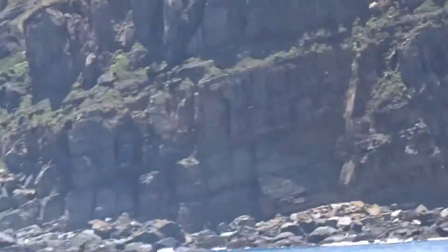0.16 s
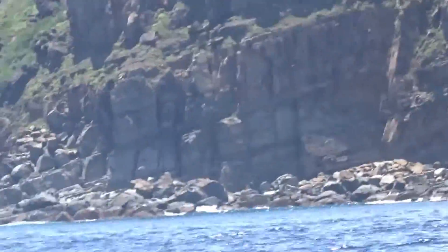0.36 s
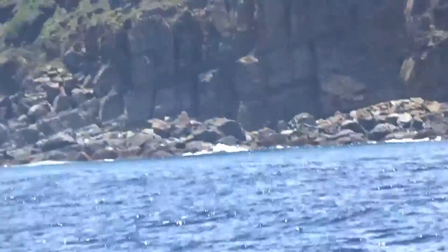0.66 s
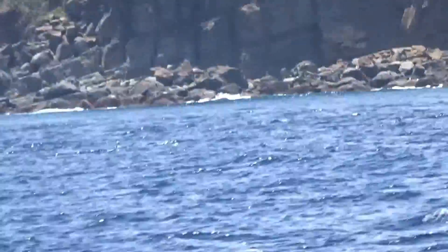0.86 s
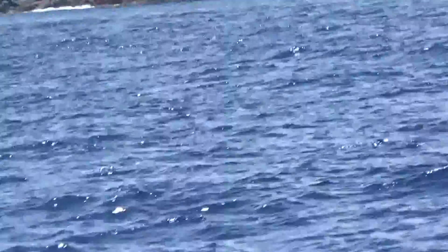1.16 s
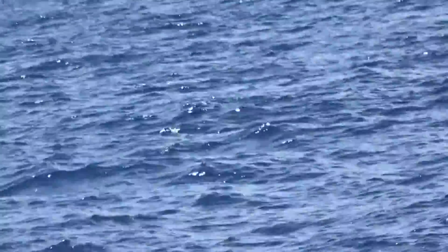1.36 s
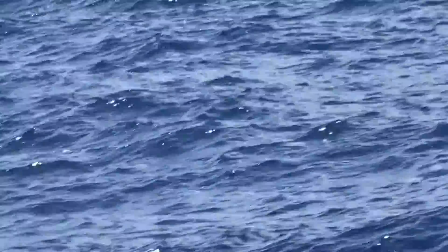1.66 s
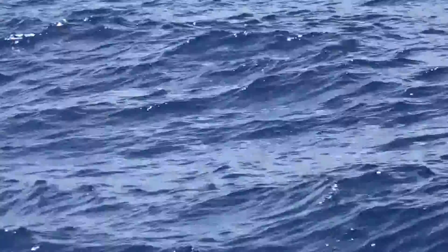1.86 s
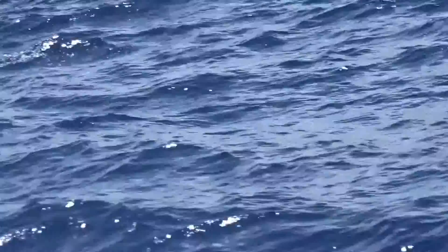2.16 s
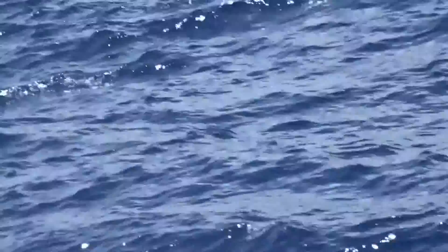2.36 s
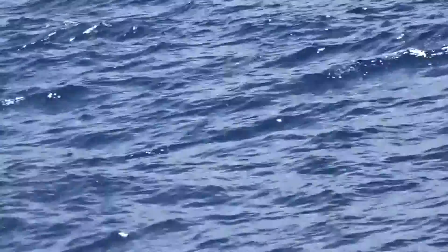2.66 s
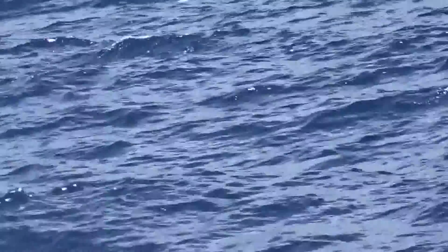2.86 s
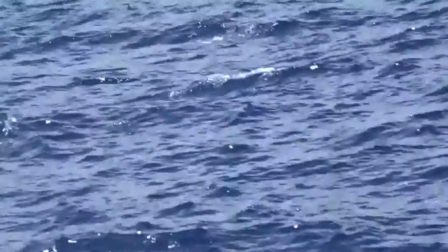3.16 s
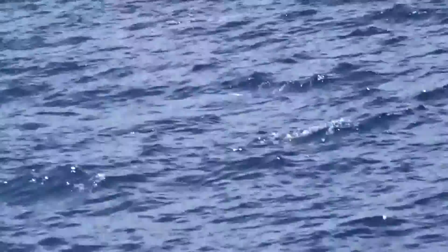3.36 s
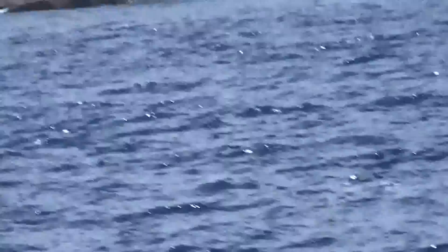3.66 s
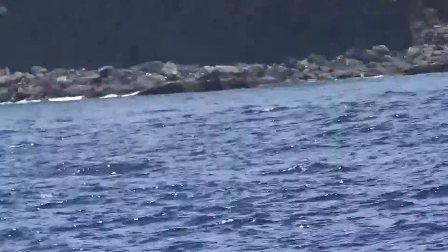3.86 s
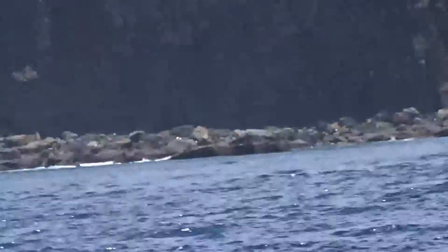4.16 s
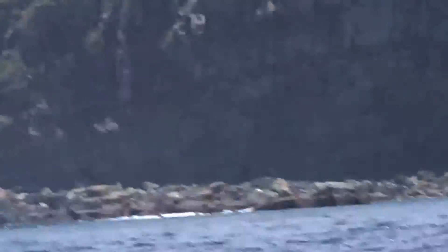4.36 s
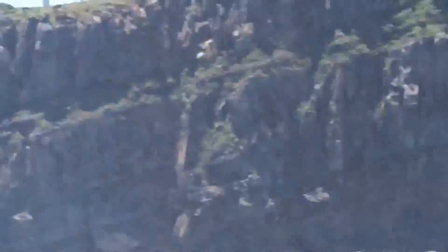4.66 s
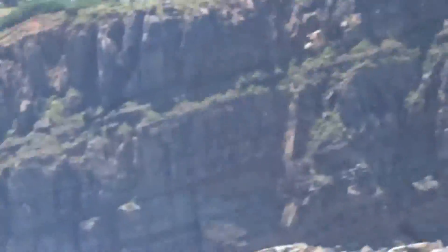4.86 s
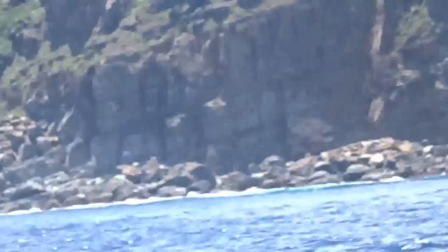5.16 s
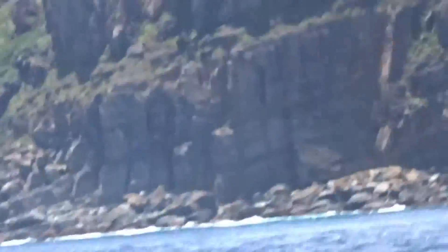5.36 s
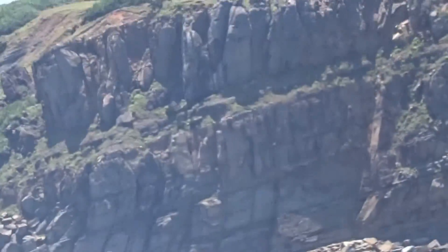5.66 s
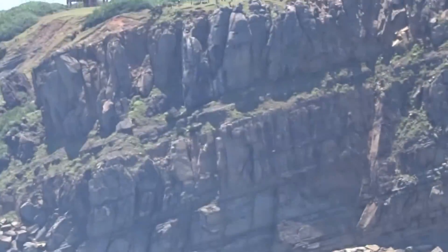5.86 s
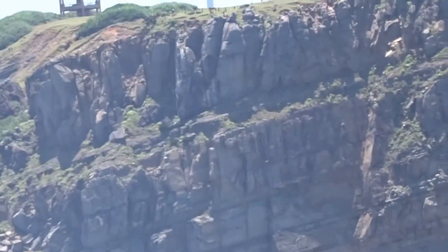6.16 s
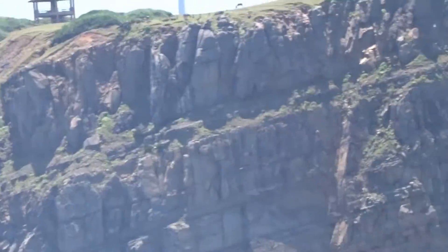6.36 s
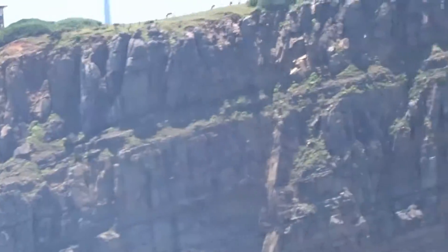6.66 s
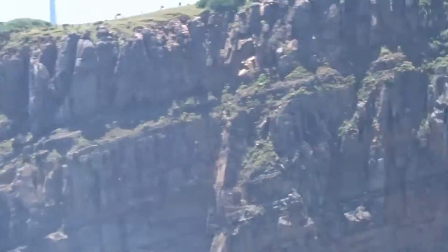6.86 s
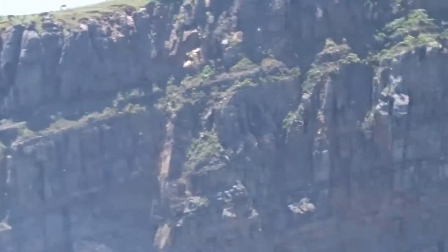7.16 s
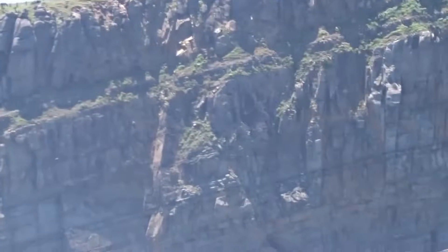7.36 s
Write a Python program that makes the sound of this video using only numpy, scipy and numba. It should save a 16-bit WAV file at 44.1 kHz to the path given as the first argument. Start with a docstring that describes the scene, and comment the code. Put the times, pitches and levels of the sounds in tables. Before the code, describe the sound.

A ship's engines hum low and steady under a broad roar, with a thin high whine and brief wind buffets on the microphone.

```python
"""Ship under way, on deck

Two main engines and a generator hum, each a set of tones locked to its crank, and beat together.
Exhaust, fans and wash roar above them as shaped noise; a turbocharger whines in lines and hiss.
Gusts buffet the microphone with bursts of low noise and single slaps, and the camera's
fast gain control pumps everything with the throb of the hum.
"""
import sys
import numpy as np
from scipy import signal
from scipy.fft import rfft, irfft, next_fast_len
from scipy.io import wavfile
from scipy.ndimage import uniform_filter1d, minimum_filter1d, map_coordinates
from numba import njit

SR = 44100
rng = np.random.default_rng(int(sys.argv[2]) if len(sys.argv) > 2 else 0)


def unload_audio(sound):
    """Save the sound as a 16-bit wav file, at the path given as the first command line argument."""
    columns = np.transpose(np.atleast_2d(sound))
    # keep every value between -1 and 1, then stretch to whole-number steps
    steps = np.round(np.clip(columns, -1, 1) * 32767)
    wavfile.write(sys.argv[1], SR, steps.astype(np.int16))


N = 331632

# Source levels are those ahead of the gain control; colours are relative.
# hum of each machine: [multiple of the cycle, rms level/dB]; starboard's level is that at mid roll
PORT_TONES = [(5, -19.5), (6, -20), (8, -36.5), (9, -40), (11, -25), (16, -34), (19, -47), (25, -45),
              (34, -44), (39, -48), (46, -51.5), (49, -50.5), (53, -50.5), (55, -50), (60, -49),
              (72, -49.5)]
STARBOARD_TONES = [(5, -36), (6, -34.5), (10, -43), (11, -32.5), (13, -38), (16, -41), (18, -46)]
GENERATOR_TONES = [(6, -44), (8, -43), (9, -39), (11, -34.5), (13, -30.5), (16, -41)]
# further port tones, shifted in phase: [multiple of the cycle, rms level/dB]
PORT_MIDDLE_TONES = [(10, -40.5), (12, -42), (13, -35), (17, -43), (20, -44.5)]
PORT_HIGH_TONES = [(21, -45), (22, -38.5), (23, -44), (27, -51), (30, -45)]
# mean cycles per second, swing with the roll in cycles per second, crank angle at the start in turns
PORT_RUN = (7.4414, .0259, .094)
STARBOARD_RUN = (7.3551, -.0276, .039)
GENERATOR_RUN = (8.2824, .006, 0)
# the ship rolls in the swell: one main engine speeds up while the other labours
ROLL_S, ROLL_PEAK_S = 4.82, 3.55  # period, moment of the deepest roll
LABOUR_DB = 3.3  # starboard is louder by this when it labours, softer when it runs free

# course of the roar: [t/s, level/dB]
ROAR_LEVEL = [(0, -26), (1, -26), (2.9, -27), (3.5, -26), (4.1, -26), (5.2, -25.5), (5.9, -26.5),
              (7.52, -25.5)]
# spectra of roar, spray and hull rumble: [f/Hz, level per Hz/dB]
ROAR_COLOUR = [(120, -1), (200, -2), (230, -0.5), (405, -0.5), (467, -2.5), (531, -2.5), (831, -4),
               (1090, -3), (1340, -5.5), (1440, -5), (3240, -11), (3930, -16.5), (4300, -19), (5590, -53),
               (9460, -120)]
SPRAY_COLOUR = [(3000, -49), (4300, 2), (5400, 2), (6200, -2), (8000, -4), (11200, -3.5), (12500, -13),
                (13800, -22), (14300, -32), (15000, -50)]
RUMBLE_COLOUR = [(15, 12), (28, 7), (45, 6.5), (62, -3), (92, 6), (150, 1), (220, -7), (400, -42)]
# duct resonances in the roar: [f/Hz, width/Hz, boost/dB]
DUCT_RESONANCES = [(540, 41, 2.5), (1070, 160, 4), (2420, 270, 2), (256, 15, 1.5), (1443, 17, 5.5),
                   (1510, 57, 2.5), (3380, 320, 2.3)]
# the roar swells once a port engine cycle and rattles
CHUG_DB, CLATTER_DB = .4, .55
CHUG_UNEVEN = .3  # share by which the swells differ
CHUG_ROLL = .5  # share of the chug lost in the deep roll and gained in the opposite one
CHUG_TURN = .53  # crank angle of the swell, in turns
# now and then one swell stands out: [t/s, extra level/dB]
SURGES = [(.345, 1), (.47, 1.5), (.605, 3), (.875, 1), (3.43, 2), (4.78, 2), (5.31, 0.5), (5.97, 4),
          (7.2, 2.5), (7.33, 2)]
SURGE_S = 0.019  # from the top of a surge to 1/e of its dB
# a band of the roar comes and goes
UPPER_BAND_HZ, UPPER_BAND_WIDTH_HZ, UPPER_BAND_DB = 1220, 120, 4.2
# how much of that band is heard: [t/s, share 0-1]
UPPER_BAND_SHARE = [(0, 0.4), (2, .2), (4.5, 0), (5.8, .4), (6.8, 0.6), (7.52, 1)]
SPRAY_DB = -14  # mean level relative to the roar
SPRAY_EXTRA_SWING = .38  # the spray follows the roar's course wider by this share
SPRAY_CHUG = 1.13  # the treble takes the chug more strongly

# turbocharger blade tone, about which the pitch wavers: [t/s, f/Hz]
BLADE_TONE = [(0, 4565), (3.1, 4564), (4.4, 4535), (6, 4513), (7.52, 4510)]
# whine at rest: [line counted from the blade tone, rms level/dB]
LINES_AT_REST = [(-2, -57), (-1, -54), (0, -58), (1, -60), (2, -58)]
# lines that sing out by turns: [start t/s, end t/s, line, rms level/dB]
SINGING_LINES = [(-.1, .55, -1, -46), (.9, 2.98, -1, -44), (2.7, 3.87, 0, -45.5), (3.5, 3.99, -1, -43.5),
                 (4.07, 4.36, 0, -41), (4.36, 5.75, 0, -48), (4.75, 5.6, 1, -49), (-.1, 3.0, -2, -52),
                 (1.4, 2.3, 0, -51), (-.1, 2.4, 1, -53), (4.45, 5.8, -1, -45), (5.87, 6.38, -1, -43),
                 (6.55, 6.8, -1, -49), (6.85, 6.98, 0, -42), (7.15, 7.4, 0, -44)]
LINE_SPACING_HZ, LINE_DRIFT_HZ, SING_FADE_S = 40, 1.4, .08
# bands of hiss: [multiple of the blade tone, width/Hz, rms level/dB]
BLADE_HISS = [(1, 130, -44.5), (1.5, 110, -55.5), (2.0, 210, -51)]

# puffs of wind on the microphone: [peak t/s, peak level/dB, length/s between points 11 dB down]
PUFFS = [(2.197, -18, 0.07), (2.267, -23.5, 0.12), (2.304, -19, .09), (2.34, -16, 0.03),
         (2.405, -24, 0.099), (2.492, -24, 0.22), (2.692, -26.5, 0.19), (3.42, -29, 0.16),
         (3.978, -23, 0.09), (4.007, -13, 0.04), (4.05, -12, 0.039), (4.098, -17, 0.055),
         (4.176, -20, 0.21)]
PUFF_RISE = 0.54  # share of the length before the peak
# single slaps of air, most of them inside the gusts: [t/s, level/dB, f/Hz, push +1 or pull -1]
SLAPS = [(2.187, -15, 250, 1), (2.281, -12, 400, -1), (2.305, -12, 250, -1), (2.332, -5, 450, -1),
         (2.345, -6, 330, 1), (2.49, -21, 300, 1), (3.989, -10, 258.6, -1), (4.0, -2, 300, 1),
         (4.014, -7, 200, 1), (4.032, -14, 300, 1), (4.049, -6, 400, 1), (4.055, -8, 350, -1),
         (4.098, -2, 453, 1), (4.172, -10, 300, -1), (4.191, -10, 280, 1), (4.776, -17, 250, 1),
         (5.828, -11, 300, 1)]
SLAP_CYCLES = 0.42  # from the middle of a slap to 1/e
# spectra of the buffeting and its rasp: [f/Hz, level per Hz/dB]
BUFFET_COLOUR = [(30, -3), (70, -4), (140, 2.5), (220, -.5), (400, -9.5), (800, -21), (1500, -47),
                 (3000, -70)]
RASP_COLOUR = [(150, -40), (300, -4), (500, 8.5), (750, 9), (1000, -35), (2000, -70)]
RASP_DB, RASP_GROWS = -22, 2.7  # level at a puff of -13 dB, power of growth: only strong puffs rasp

# faint noise, independent on the two sides: [f/Hz, level per Hz/dB]
SIDE_NOISE_COLOUR = [(20, 20), (45, 2), (80, 23), (150, 6.5), (400, 2.5), (1000, 2), (2000, -6),
                     (4000, -13.5), (5500, -18), (8000, -27.5), (12000, -39), (15000, -64)]

# stereo widening of a nearly mono sound: [f/Hz, lead of the left channel/rad]
LEFT_LEAD = [(20, 0.41), (45, 0.37), (82, 0.65), (110, 0.77), (260, 1.44), (600, 1.64), (1300, 1.36),
             (2670, 0.84), (5500, 0.44), (7100, .12), (14700, .08)]
# stereo balance: [f/Hz, left minus right level/dB]
LEFT_TILT = [(35, .8), (82, .3), (180, -.3), (540, -1), (1620, -1.7), (4850, -1.8), (14600, -0.8)]
TOP_HZ = 15150  # nothing passes above


def amp(db):
    """Amplitude of a level in dB."""
    return 10 ** (np.asarray(db) / 20)


def unit(x):
    """x scaled to rms 1."""
    return x / np.sqrt(np.mean(x ** 2) + 1e-20)


def along(points, hz):
    """(Hz, value) points read along a log frequency axis."""
    f, v = np.transpose(points)
    return np.interp(np.log(hz + 1), np.log(f + 1), v)


def curve(rows):
    """(s, value) points drawn out to one value per sample."""
    s, values = np.transpose(rows)
    return np.interp(np.arange(N) / SR, s, values)


def wobble(rate):
    """A smooth random curve, rate knots a second."""
    knots = rng.standard_normal(int(N * rate / SR) + 4)
    return map_coordinates(knots, [np.arange(N) * rate / SR])


def filtered(x, response):
    """x, mirrored past its ends, times a complex response of frequency."""
    edge = SR // 4
    longer = np.pad(x, [(0, 0)] * (x.ndim - 1) + [(edge, edge)], mode="reflect")
    m = next_fast_len(N + 2 * edge)
    spectrum = rfft(longer, m) * response(np.fft.rfftfreq(m, 1 / SR))
    return irfft(spectrum, m)[..., edge:edge + N]


def bell(hz, centre, width):
    """A resonance curve, 1 at the centre and half at the edges of its width."""
    return 1 / (1 + (2 * (hz - centre) / width) ** 2)


def rush(colour, patchy_db):
    """Coloured noise of rms 1 with patches of random gain in time and frequency."""
    z = signal.stft(rng.standard_normal(N + 512), nperseg=512)[2]
    patches = uniform_filter1d(rng.standard_normal(z.shape), 8, 0)
    patches = unit(uniform_filter1d(patches, 10, 1))
    noise = signal.istft(z * amp(patchy_db * patches), nperseg=512)[1][:N]
    return unit(filtered(noise, lambda hz: amp(along(colour, hz))))


def hum():
    """Three machines at nearly equal speeds beat against each other."""
    port = engine(PORT_RUN, PORT_TONES, lag=-.12)
    port = port + engine(PORT_RUN, PORT_MIDDLE_TONES, lag=.2)
    port = port + engine(PORT_RUN, PORT_HIGH_TONES, lag=.47)
    starboard = engine(STARBOARD_RUN, STARBOARD_TONES, lag=.42, upper_lag=.18)
    generator = engine(GENERATOR_RUN, GENERATOR_TONES, lag=-.47)
    return port + amp(LABOUR_DB * roll()) * starboard + generator


def engine(run, tones, lag, upper_lag=1 / 3):
    """Tones locked to the crank, each shifted in phase by lag, in turns of the tone."""
    sound, turns = 0, crank(run)
    for k, db in tones:
        upper = k > 6.5  # above the hull's resonance tones lag more
        phase = k * turns - lag - upper * upper_lag
        level = amp(db + .5 * wobble(3))
        sound = sound + np.sqrt(2) * level * np.cos(2 * np.pi * phase)
    return sound


def crank(run):
    """Crank angle in turns: the speed, swinging with the roll, summed over time."""
    speed, swing, start = run
    return start + np.cumsum(speed + swing * roll()) / SR


def roll():
    """The ship's roll, a slow cosine that is 1 at its deepest."""
    return np.cos(2 * np.pi * (np.arange(N) / SR - ROLL_PEAK_S) / ROLL_S)


def roar():
    """Exhaust and fans in the middle, wash and spray on top, hull rumble below, all shaped noise."""
    roar_db, chug_db = curve(ROAR_LEVEL), chug()
    swell = 0.59 * wobble(3.44)

    def ducts(hz):
        return amp(sum(db * bell(hz, centre, width) for centre, width, db in DUCT_RESONANCES))

    def upper_boost(hz):
        # only what the band adds
        return amp(UPPER_BAND_DB * bell(hz, UPPER_BAND_HZ, UPPER_BAND_WIDTH_HZ)) - 1

    plain = filtered(rush(ROAR_COLOUR, patchy_db=0.54), ducts)
    band = curve(UPPER_BAND_SHARE) * filtered(plain, upper_boost)
    middle = amp(roar_db + .5 * swell + chug_db) * (plain + band)

    spray_db = SPRAY_DB + roar_db + SPRAY_EXTRA_SWING * (roar_db - roar_db.mean())
    spray_db = spray_db + SPRAY_CHUG * chug_db + 0.19 * swell + 0.12 * wobble(12)
    spray = amp(spray_db) * rush(SPRAY_COLOUR, patchy_db=0.67)
    rumble = amp(-26.5) * rush(RUMBLE_COLOUR, patchy_db=0.0)
    return middle + spray + rumble


def chug():
    """Level of the roar in dB as it swells with the port engine's cycle, rattles and surges."""
    t = np.arange(N) / SR
    depth = CHUG_DB * (1 - CHUG_ROLL * roll()) * (1 + CHUG_UNEVEN * wobble(6))
    level_db = depth * np.cos(2 * np.pi * (crank(PORT_RUN) - CHUG_TURN))
    level_db = level_db + CLATTER_DB * wobble(40)
    for s, db in SURGES:
        level_db = level_db + db * np.exp(-((t - s) / SURGE_S) ** 2)
    return level_db


def turbocharger():
    """A blade tone split into evenly spaced lines that take turns to sing, in hiss that follows it."""
    turns = np.cumsum(curve(BLADE_TONE) + 1.1 * wobble(14)) / SR
    return whine(turns) + blade_hiss(turns)


def whine(turns):
    """Sine lines about the blade tone, each drifting a little and singing out in its turns."""
    t, lines = np.arange(N) / SR, 0
    for k, rest_db in LINES_AT_REST:
        level = amp(rest_db + 1.4 * wobble(2.3))
        for start, end, line, db in SINGING_LINES:
            if line == k:
                inside = np.minimum(t - start, end - t)
                fade = np.clip(inside / SING_FADE_S + .5, 0, 1)
                level = np.maximum(level, amp(db) * fade)
        offset = np.cumsum(k * LINE_SPACING_HZ + LINE_DRIFT_HZ * wobble(5)) / SR
        level = level * amp(0.33 * wobble(5.33))
        lines = lines + np.sqrt(2) * level * np.sin(2 * np.pi * (turns + offset + rng.random()))
    return lines


def blade_hiss(turns):
    """Slow noise on a carrier makes bands of hiss that move with the shaft."""
    hiss = 0
    for multiple, width_hz, db in BLADE_HISS:
        slow = filtered(rng.standard_normal((2, N)), lambda hz: bell(hz, 0, width_hz))
        carrier = np.exp(2j * np.pi * multiple * turns)
        hiss = hiss + amp(db) * unit(((slow[0] + 1j * slow[1]) * carrier).real)
    return hiss


def wind():
    """Gusts hit the microphone in lumpy puffs that build up and break off; the strongest rasp higher."""
    t, power = np.arange(N) / SR, np.zeros(N)
    for s, db, length in PUFFS:
        away = np.where(t < s, (s - t) / PUFF_RISE, (t - s) / (1 - PUFF_RISE)) / length
        power += amp(db - 11.1 * away ** 1.7) ** 2
    level = np.sqrt(power)
    lumpy = unit(amp(1.4 * wobble(45)) * rush(BUFFET_COLOUR, patchy_db=0.4))
    rasp = amp(RASP_DB) * (level / amp(-13)) ** RASP_GROWS * rush(RASP_COLOUR, patchy_db=2.0)
    # each microphone port's own share
    apart = np.array([rush(BUFFET_COLOUR, patchy_db=7.0) for _ in range(2)])
    return level * lumpy + slaps() + rasp + amp(-13.5) * level * apart


def slaps():
    """Each slap of air is about one cycle of pressure under a bell-shaped envelope."""
    out, t = np.zeros(N), np.arange(-600, 600) / SR
    for s, db, hz, sign in SLAPS:
        cycle = np.cos(2 * np.pi * hz * t - .8)
        envelope = np.exp(-(hz * t / SLAP_CYCLES) ** 2)
        out[round(s * SR) - 600:][:len(t)] += sign * amp(db) * cycle * envelope
    return out


def side_noise():
    """Faint noise, independent on the two sides."""
    return amp(-34.5) * np.array([rush(SIDE_NOISE_COLOUR, patchy_db=2.0) for _ in range(2)])


def scene():
    """The ship and the wind heard on deck, the same on both sides but for some noise."""
    return hum() + roar() + turbocharger() + wind() + side_noise()


@njit
def follow(x, rise, fall, level):
    """Level detector that rises fast and falls slowly."""
    out = np.empty_like(x)
    for i in range(len(x)):
        level += (x[i] - level) * (rise if x[i] > level else fall)
        out[i] = level
    return out


def gain_control(x, rest_db, strength, attack, release):
    """Louder than rest_db is turned down, softer is turned up; attack and release in seconds."""
    level = follow(np.abs(x).max(0), 1 / (attack * SR), 1 / (release * SR), amp(rest_db))
    return x * (level / amp(rest_db)) ** -strength


def limiter(x, top, hold):
    """Peaks over top pull both sides down for some milliseconds; hold in seconds."""
    span = round(hold * SR)
    needed = np.minimum(1, top / (np.abs(x).max(0) + 1e-9))
    return x * uniform_filter1d(minimum_filter1d(needed, 2 * span), span)


def record(dry):
    """Stereo widening by phase, gain control, bass cut, limiter, treble roll-off, band limit."""
    side = np.array([[.5], [-.5]])  # left, right

    def widening(hz):
        lead = along(LEFT_LEAD, hz)
        # the cosine makes up for what the phase shift costs the sum of both sides
        return amp(side * along(LEFT_TILT, hz)) * np.exp(1j * side * lead) / np.cos(lead / 2)

    def bass_cut(hz):
        return hz / np.hypot(hz, 60)

    def treble_cut(hz):
        return (hz < TOP_HZ) / (1 + (hz / 14300) ** 40)

    wide = filtered(dry, widening)
    even = gain_control(wide, rest_db=-10.5, strength=0.45, attack=0.00098, release=0.015)
    held = limiter(filtered(even, bass_cut), top=.48, hold=.008)
    return filtered(held, treble_cut)


dry = scene()
out = record(dry)
unload_audio(out)
```